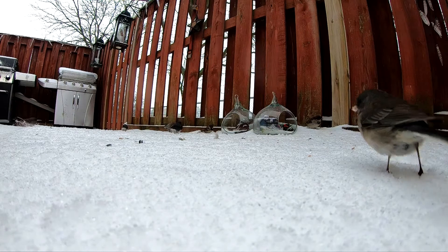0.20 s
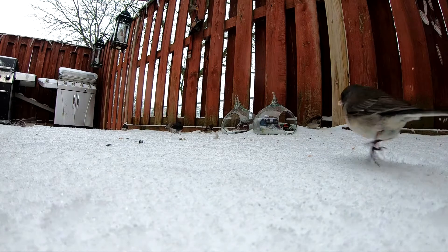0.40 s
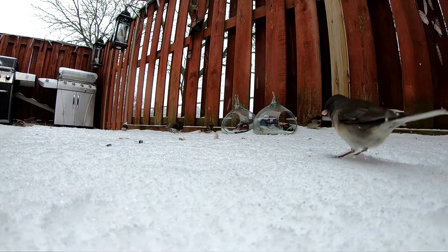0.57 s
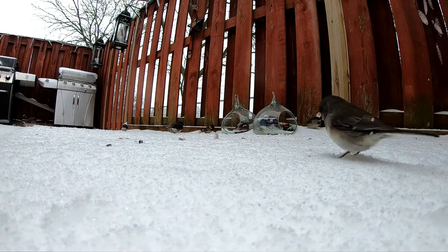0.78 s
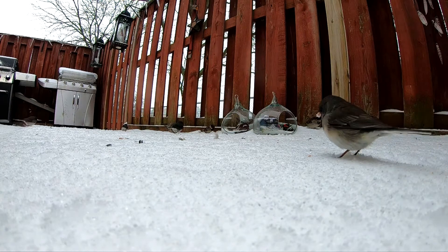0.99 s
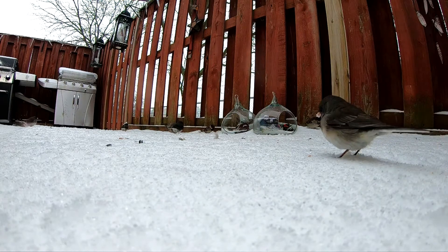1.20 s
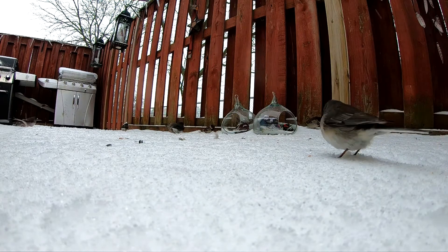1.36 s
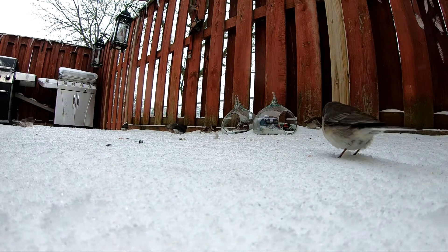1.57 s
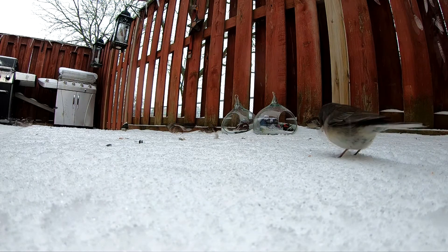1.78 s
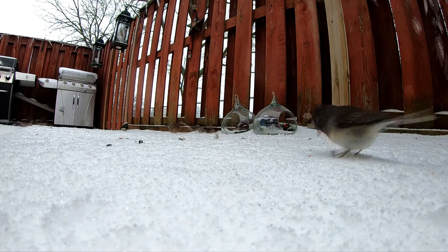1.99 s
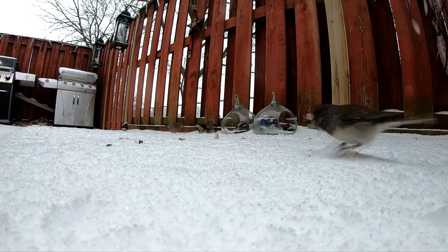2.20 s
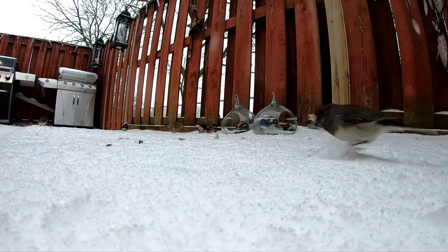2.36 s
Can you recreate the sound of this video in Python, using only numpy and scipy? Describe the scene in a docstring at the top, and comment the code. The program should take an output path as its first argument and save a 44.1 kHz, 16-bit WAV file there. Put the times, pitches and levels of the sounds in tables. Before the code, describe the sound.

Ice pellets tick and patter on crusted snow, mostly left, over low wind rumble and faint air hush; a small bird's hop crunches and thumps early, more near the end, heard by a microphone lying on the snow.

```python
"""Wind rumbles on two ports of a microphone lying on crusted snow; air hush and fine ice patter run throughout.
A pellet ticks on the right at 0.08 s, then a small bird's hop crunches and thumps on the left at 0.21 s.
Near pellets, mostly by the left port, tick (band-filtered impulses with rebound and noise) over dull knocks;
one at 0.90 s leaves a short ring. The patter peaks at 1.1-1.6 s and dips at 1.75 s; softer crunches
(band-filtered random impulses) come between. More crunches, thumps and scuffs at 2.07-2.25 s; pellets tick on."""
import sys
import numpy as np
from scipy import signal
from scipy.fft import rfft, irfft
from scipy.io import wavfile

SR = 44100
rng = np.random.default_rng(int(sys.argv[2]) if len(sys.argv) > 2 else 0)


def persist_wave(psi):
    """Save psi, clipped to +-1, as 16-bit WAV."""
    counts = np.round(np.clip(psi, -1, 1) * 32767).astype(np.int16)
    wavfile.write(sys.argv[1], SR, np.atleast_2d(counts).T)


N = 112455

# Near pellets, levels before trim: start_s, level_db, pitch_hz, half_band_octaves, knock_db, left_minus_right_db
NEAR_PELLETS = [(0.0845, -31.5, 3520, 0.49, -56, -17), (0.311, -30.5, 6400, 0.55, -64, 31),
                (0.3791, -29, 6900, 1.6, -49, 25), (0.43, -29, 8000, 2.2, -43.5, 28),
                (0.5195, -19, 7160, 0.95, -32, 29), (0.59, -45.5, 7500, 1, -46, 17),
                (0.6386, -43.5, 6250, 0.44, -46, 23), (0.6933, -33, 5670, 1.4, -56, 24),
                (0.7212, -40, 7400, 0.75, -46, 24), (0.782, -21.5, 8400, 2, -32.5, 23),
                (0.822, -38.5, 9500, 0.46, -44, 23), (0.8392, -36, 7400, 0.98, -38, 31),
                (0.9024, -17, 6000, 0.84, -25, 43), (0.953, -39.5, 8800, 0.66, -49, 22),
                (1.005, -26, 5830, 0.61, -42.5, 24), (1.0457, -35.5, 6900, 0.53, -56, 16),
                (1.1291, -30, 6260, 1.7, -64, 31), (1.1391, -40, 6300, 1.3, -55, 24),
                (1.1765, -29, 5200, 0.26, -61, 12), (1.2119, -30, 7900, 1, -41.5, 27),
                (1.218, -28, 7900, 1.8, -56, 24), (1.279, -31.5, 7900, 1.1, -51, 13),
                (1.3286, -32, 7100, 0.23, -53, 22), (1.3347, -29, 6900, 0.79, -36.5, 28),
                (1.412, -32.5, 7900, 0.81, -48, 13), (1.4156, -30.5, 7850, 0.3, -44, 27),
                (1.4427, -31, 5000, 1.16, -42, 14), (1.4562, -31, 7900, 1.2, -65, 28),
                (1.57, -34.5, 6060, 0.57, -46, 29), (1.6036, -25, 8400, 0.8, -41, 35),
                (1.6649, -39, 6200, 0.62, -48, 17), (1.7429, -38.5, 4500, 0.92, -77, -8),
                (1.7952, -35.5, 8360, 0.62, -44, 25), (1.9058, -30.5, 4170, 1.14, -43, 23),
                (2.0013, -35.5, 10900, 0.68, -43.5, 11), (2.1735, -22.5, 9000, 3.1, -34.5, 32),
                (2.1935, -34, 7560, 0.82, -44.5, 24), (2.2525, -16, 2590, 0.27, -20, 43),
                (2.396, -36.5, 9000, 0.38, -53, 23), (2.4162, -30.5, 4040, 0.68, -32.5, 36),
                (2.437, -39, 9800, 0.62, -50, 4), (2.4983, -34, 6840, 0.88, -46.5, 30)]
# Fine patter strength: time_s, gain_db
PATTER_STRENGTH = [(0, -6.5), (.3, -10), (.55, -0.5), (.75, -0.5), (1.1, 3), (1.42, 2), (1.62, 3),
                   (1.75, -11), (2.05, -5), (2.2, -5), (2.45, -2.5), (2.55, 0)]
# Crust crunches, level before trim: start_s, level_db, hold_end_s (after start), decay_s, pitch_hz,
# half_band_octaves, body_re_crust_db, left_minus_right_db
CRUST_CRUNCHES = [(0.2073, -17, 0.0033, 0.0077, 4170, 1.21, -7.5, 33),
                  (0.3767, -39, 0.0068, 0.0014, 4900, 1.3, -12, 12),
                  (0.694, -47, .006, 0.0096, 6900, 3, -21, 14),
                  (0.7382, -34, 0.0043, 0.0039, 7200, 2.4, -11, 4.5),
                  (1.288, -40.5, 0.031, 0.022, 8360, 2.5, -13, 11),
                  (1.397, -48, 0.021, 0.0076, 8000, 1.6, -18, 2),
                  (1.438, -47.5, 0.024, .007, 7100, 1.5, -17, 13),
                  (1.803, -44, 0.0055, 0.01, 8200, .6, -16, 18),
                  (1.907, -45, 0.0057, 0.0047, 6000, 1.4, -17, 8),
                  (1.926, -39, 0.012, 0.0057, 4940, 1.32, -3, 12),
                  (2.0867, -40.5, 0.0018, .002, 6000, 0.73, -11, 10),
                  (2.1228, -20, 0.0031, 0.0041, 6400, 1.1, -12, 32),
                  (2.172, -44, .008, .004, 8000, 1.8, -16, 18),
                  (2.308, -35, 0.0086, 0.0096, 5370, 0.87, -16.5, 14),
                  (2.398, -49, 0.013, 0.0069, 6400, 2.3, -9, 23)]
# Microphone case modes: mode_hz, relative_db, t60_s
CASE_MODES = [(2780, -11, 0.14), (2950, 5, 0.088), (3350, 12, .04), (3810, -5, 0.14), (5400, -10, 0.015)]
# Ground thumps: start_s, level_db, initial_pitch_hz, rise_s, decay_s
GROUND_THUMPS = [(0.2105, -8.5, 112.8, 0.015, 0.0071), (0.2139, -12.5, 37.7, 0.011, 0.041),
                 (0.213, -23.5, 323, 0.0054, 0.0083), (2.0714, -22, 260, 0.00065, 0.0026),
                 (2.125, -25, 254, 0.00072, 0.0047), (2.126, -22, 104, 0.0057, .011),
                 (2.1748, -29, 106, 0.0036, .009), (2.253, -30, 153, 0.0021, 0.0038)]
# Soft snow scuffs: start_s, level_db, rise_s, decay_s, pitch_hz, half_band_octaves
SNOW_SCUFFS = [(.216, -28.5, 0.0056, 0.0055, 386, 0.31), (.877, -38, 0.0026, 0.0039, 940, 0.81),
               (.902, -34, .002, 0.0052, 370, 0.54), (1.508, -40.5, 0.0028, 0.0062, 726, 0.72),
               (1.908, -45.5, 0.0036, 0.0066, 277.8, .8), (1.928, -35.5, 0.01, 0.0098, 186, 0.72),
               (2.0716, -35, 0.00059, 0.0019, 1700, 0.28), (2.0724, -32, 0.0014, 0.007, 326, 0.42),
               (2.125, -29, 0.0006, 0.0039, 1740, 0.27), (2.2537, -28, 0.0002, 0.001, 1458, 0.11)]
# Rings after a hard pellet: start_s, peak_db, pitch_hz, t60_s, left_minus_right_db
PELLET_RINGS = [(.9025, -40, 2080, 0.094, 24)]
# Wind level at the ports: time_s, left_db, right_db
WIND_LEVELS = [(0, -49.5, -36), (.15, -46, -33.5), (.42, -43, -44.5), (0.512, -42.5, -26.5),
               (.61, -44, -38.5), (.70, -31.5, -26.5), (.80, -38.5, -39), (.89, -34.5, -23),
               (1.05, -35.5, -26.5), (1.18, -43.5, -32), (1.30, -31, -31.5), (1.5, -39, -30),
               (1.72, -52, -38), (1.85, -42.5, -37), (1.97, -38.5, -37), (2.2, -38, -42.5),
               (2.55, -45.5, -38)]
# Wind spectra per port: frequency_hz, relative_db_per_hz
WIND_LEFT_SPECTRUM = [(12, -2), (25, -7), (45, 2.5), (70, -4.5), (120, -5.5), (180, -14.5), (300, -24.5),
                      (600, -31), (1500, -43), (5000, -67)]
WIND_RIGHT_SPECTRUM = [(12, -6.5), (25, -5), (42, 5.5), (65, -1), (100, -13), (160, -26.5), (300, -33),
                       (600, -46.5), (1500, -61), (5000, -87)]
# Air hush spectrum: frequency_hz, relative_db_per_hz
AIR_SPECTRUM = [(20, 11.5), (120, 4.5), (300, 5.5), (450, -0.5), (650, 1.5), (900, -4), (1300, -6.5),
                (2500, -8), (4500, -19), (9000, -22), (15000, -25.5), (20000, -36)]

# Pellet contact; times are noise decay constants except LEAD_S and MEAN_REBOUND_S
LEAD_S, CRUSH_S, CRUSH_DB = 0.0013, 0.00034, 2.5
MEAN_REBOUND_S, REBOUND_SHARE = 0.00053, 0.32
RATTLE_S, RATTLE_DB = 0.001, -7
NEAR_SKITTER_S, NEAR_SKITTER_DB = 0.0035, -17
FINE_SKITTER_S, FINE_SKITTER_DB = 0.003, -1
KNOCK_HZ, KNOCK_HALF_BAND_OCTAVES, KNOCK_DECAY_S = 596, 2.64, 0.0026
PELLET_TRIM_DB, KNOCK_TRIM_DB = -0.5, 1

PATTER_PER_S, PATTER_FLOOR_DB, PATTER_SPREAD_DB, PATTER_MAX_RISE_DB = 210, -61, 6, 17
PATTER_MEDIAN_HZ, PATTER_PITCH_SPREAD_OCTAVES, PATTER_HALF_BAND_OCTAVES = 7040, 0.4, 1
PATTER_MEAN_PAN_DB, PATTER_PAN_SPREAD_DB = 8, 5.5

CRACKS_PER_S, CRACK_SPREAD_DB, YIELD_S, CRUNCH_TRIM_DB = 8000, 6, 0.0021, 1.5
BODY_HZ, BODY_HALF_BAND_OCTAVES = 600, 0.72
CASE_DB = -21
THUMP_PAN_DB, THUMP_SAG, SCUFF_PAN_DB = 25, 0.053, 19.5
GRIT_DB, GRIT_HZ, GRIT_DECAY_S = -9, 1700, 0.0052
AIR_DB, AIR_WAVER_DB = -54, 2
TOP_HZ = 15800


def undb(db):
    """Decibels to amplitude gain."""
    return 10 ** (np.asarray(db) / 20)


def unit(x):
    """Scale to an energy of one."""
    return x / np.sqrt(np.sum(x ** 2) + 1e-18)


def burst(x, db):
    """Give a click the energy of one millisecond at this rms level."""
    return unit(x) * undb(db) * np.sqrt(SR / 1000)


def band(x, hz, half_band_octaves):
    """Broad resonance: band-pass to each side of its pitch, top edge capped."""
    high_hz = min(hz * 2 ** half_band_octaves, 0.45 * SR)
    low_hz = hz / 2 ** half_band_octaves
    sos = signal.butter(2, [low_hz, high_hz], "band", fs=SR, output="sos")
    return signal.sosfilt(sos, x)


def swell(t, rise_s, decay_s):
    """Linear rise, exponential fall."""
    return np.minimum(t / rise_s, 1) * np.exp(-np.maximum(t - rise_s, 0) / decay_s)


def damped_sine(t, hz, t60_s):
    """Sine losing 60 dB in t60_s."""
    return np.sin(2 * np.pi * hz * t) * np.exp(-np.log(1000) * t / t60_s)


def sides(pan_db):
    """Left and right gains; the nearer port hears the full level."""
    return undb(np.minimum([pan_db, -pan_db], 0))


def add(out, start_s, sound):
    """Mix a stereo sound in at a time."""
    i = int(start_s * SR)
    out[:, i:i + sound.shape[1]] += sound[:, :N - i]


def tick(hz, half_band_octaves, skitter_s, skitter_db, size=700):
    """Pellet on crust: yielding, contact, rebound and dying rattle excite a band, drawn anew per port."""
    lead = int(LEAD_S * SR)
    t = (np.arange(size) - lead) / SR
    push = np.zeros((2, size))
    push[:, lead] = 1
    for port in push:
        rebound = int(MEAN_REBOUND_S * SR * rng.uniform(0.7, 1.3))
        port[lead + rebound] += REBOUND_SHARE * rng.choice([-1, 1])
        crush = rng.standard_normal(size) * (t < 0) * np.exp(-abs(t) / CRUSH_S)
        rattle = rng.standard_normal(size) * (t > 0) * np.exp(-abs(t) / RATTLE_S)
        # cubing makes the noise spiky
        skitter = rng.standard_normal(size) ** 3 * (t > 0) * np.exp(-abs(t) / skitter_s)
        port += undb(CRUSH_DB) * unit(crush)
        port += undb(RATTLE_DB) * unit(rattle)
        port += undb(skitter_db) * unit(skitter)
    return band(push, hz, half_band_octaves)


def panned_tick(ports, db, pan_db):
    """Set each port's tick to its level."""
    return np.array([gain * burst(x, db) for gain, x in zip(sides(pan_db), ports)])


def pellets(size=700):
    """Near pellets: bright tick over a dull knock, a band-filtered impulse with decaying noise."""
    out, t = np.zeros((2, N)), np.arange(size) / SR
    for start_s, db, hz, octaves, knock_db, pan_db in NEAR_PELLETS:
        push = unit(rng.standard_normal(size) * np.exp(-t / KNOCK_DECAY_S)) + (t == 0)
        knock = burst(band(push, KNOCK_HZ, KNOCK_HALF_BAND_OCTAVES), knock_db + KNOCK_TRIM_DB)
        ports = tick(hz, octaves, NEAR_SKITTER_S, NEAR_SKITTER_DB)
        add(out, start_s - LEAD_S, panned_tick(ports, db + PELLET_TRIM_DB, pan_db))
        add(out, start_s, np.outer(sides(pan_db), knock))
    return out


def pings(size=8000):
    """Hard pellet's faint ring: damped sine."""
    out, t = np.zeros((2, N)), np.arange(size) / SR
    for start_s, db, hz, t60_s, pan_db in PELLET_RINGS:
        add(out, start_s, np.outer(sides(pan_db), undb(db) * damped_sine(t, hz, t60_s)))
    return out


def patter(count=900):
    """Fine pellets at random times, mostly faint and toward the left."""
    out = np.zeros((2, N))
    gaps, sizes = rng.exponential(size=(count, 2)).T
    pitches, places = rng.standard_normal((count, 2)).T
    starts_s = np.cumsum(gaps) / PATTER_PER_S
    times_s, strength_db = np.array(PATTER_STRENGTH).T
    for start_s, pellet_size, pitch, place in zip(starts_s, sizes, pitches, places):
        if start_s >= N / SR:
            break
        rise_db = min(PATTER_SPREAD_DB * pellet_size, PATTER_MAX_RISE_DB)
        db = PATTER_FLOOR_DB + rise_db + np.interp(start_s, times_s, strength_db)
        hz = PATTER_MEDIAN_HZ * 2 ** (PATTER_PITCH_SPREAD_OCTAVES * pitch)
        pan_db = PATTER_MEAN_PAN_DB + PATTER_PAN_SPREAD_DB * place
        ports = tick(hz, PATTER_HALF_BAND_OCTAVES, FINE_SKITTER_S, FINE_SKITTER_DB)
        add(out, start_s, panned_tick(ports, db, pan_db))
    return out


def crunches(size=6000):
    """Crust gives way: a dense, dying run of random cracks through a bright and a low band."""
    out, t = np.zeros((2, N)), np.arange(size) / SR
    for start_s, db, hold_end_s, decay_s, hz, octaves, body_db, pan_db in CRUST_CRUNCHES:
        fade = np.minimum(t / YIELD_S, 1) * np.exp(-np.maximum(t - hold_end_s, 0) / decay_s)
        ports = []
        for gain in sides(pan_db):
            cracks = (rng.random(size) < CRACKS_PER_S / SR) * rng.choice([-1, 1], size)
            cracks = cracks * undb(CRACK_SPREAD_DB * rng.uniform(-2.4, 2.4, size))
            crust = unit(band(cracks, hz, octaves))
            body = undb(body_db) * unit(band(cracks, BODY_HZ, BODY_HALF_BAND_OCTAVES))
            ports.append(gain * undb(db + CRUNCH_TRIM_DB) * np.sqrt(size) * fade * (crust + body))
        add(out, start_s, np.array(ports))
    return out


def case(x, size=5000):
    """Microphone case rung by the crunches: convolution with damped modes."""
    t = np.arange(size) / SR
    ring = sum(undb(db) * damped_sine(t, hz, t60_s) for hz, db, t60_s in CASE_MODES)
    return x + undb(CASE_DB) * signal.fftconvolve(x, unit(ring)[None], axes=1)[:, :N]


def thumps(size=9000):
    """Ground thumps: low damped swings sagging in pitch, with noise grit on top."""
    out, t = np.zeros((2, N)), np.arange(size) / SR
    for start_s, db, hz, rise_s, decay_s in GROUND_THUMPS:
        sagging_hz = hz / (1 + THUMP_SAG * t / (rise_s + decay_s))
        swing = -np.sin(2 * np.pi * np.cumsum(sagging_hz) / SR)
        rough = np.sqrt(size) * unit(band(rng.standard_normal(size), GRIT_HZ, 1))
        grit = undb(GRIT_DB) * rough * np.exp(-t / GRIT_DECAY_S)
        thump = undb(db) * swell(t, rise_s, decay_s) * (swing + grit)
        add(out, start_s, np.outer(sides(THUMP_PAN_DB), thump))
    return out


def scuffs(size=4000):
    """Softer snow under the crust: short swells of band-filtered noise."""
    out, t = np.zeros((2, N)), np.arange(size) / SR
    for start_s, db, rise_s, decay_s, hz, octaves in SNOW_SCUFFS:
        envelope = swell(t, rise_s, decay_s)
        rub = unit(band(rng.standard_normal(size), hz, octaves) * envelope)
        scuff = undb(db) * rub * np.sqrt(np.sum(envelope ** 2))
        add(out, start_s, np.outer(sides(SCUFF_PAN_DB), scuff))
    return out


def noise(spectrum):
    """Gaussian noise of rms one, shaped by a spectrum table."""
    hz, db = np.array(spectrum).T
    bins_hz = np.fft.rfftfreq(N, 1 / SR)
    gain = undb(np.interp(np.log(bins_hz + 1), np.log(hz), db))
    return unit(irfft(rfft(rng.standard_normal(N)) * gain, N)) * np.sqrt(N)


def wind():
    """Gusts buffet each port independently: low shaped noise under separate level curves."""
    times_s, left_db, right_db = np.array(WIND_LEVELS).T
    t = np.arange(N) / SR
    left = noise(WIND_LEFT_SPECTRUM) * undb(np.interp(t, times_s, left_db))
    right = noise(WIND_RIGHT_SPECTRUM) * undb(np.interp(t, times_s, right_db))
    return np.array([left, right])


def air(count=40):
    """Hush of the yard: shaped noise per port, sharing one random level waver."""
    waver = np.interp(np.arange(N), np.linspace(0, N, count), rng.standard_normal(count))
    return np.array([noise(AIR_SPECTRUM), noise(AIR_SPECTRUM)]) * undb(AIR_DB + AIR_WAVER_DB * waver)


def scene():
    """Wind and hush, the bird's hops, pellets and patter."""
    background = wind() + air()
    bird = thumps() + scuffs() + case(crunches())
    ice = pellets() + pings() + patter()
    return background + bird + ice


def record(dry):
    """Recorder's steep low-pass cuts the top."""
    return signal.sosfilt(signal.ellip(8, 0.2, 70, TOP_HZ, fs=SR, output="sos"), dry)


dry = scene()
out = record(dry)
persist_wave(out)
```